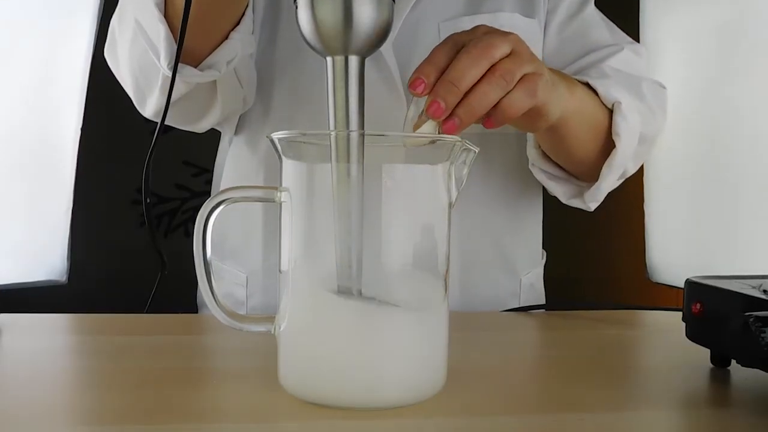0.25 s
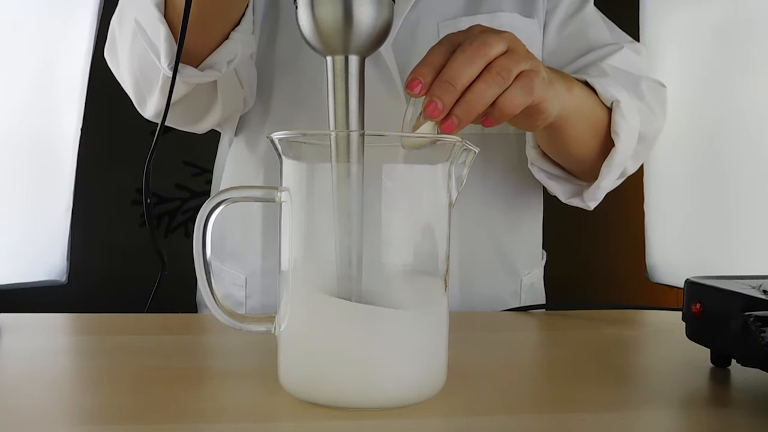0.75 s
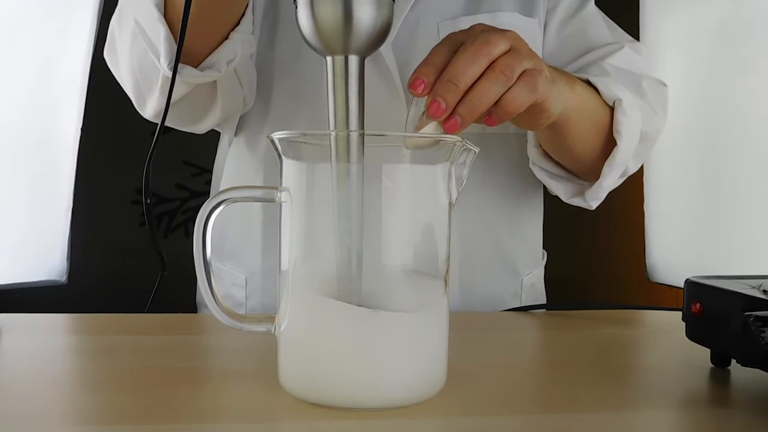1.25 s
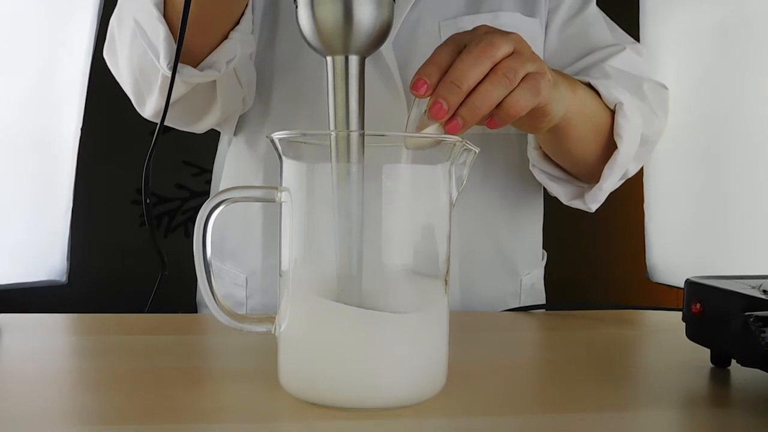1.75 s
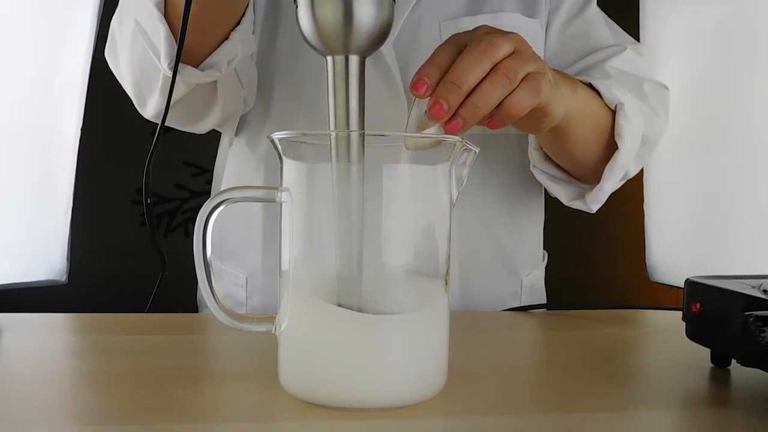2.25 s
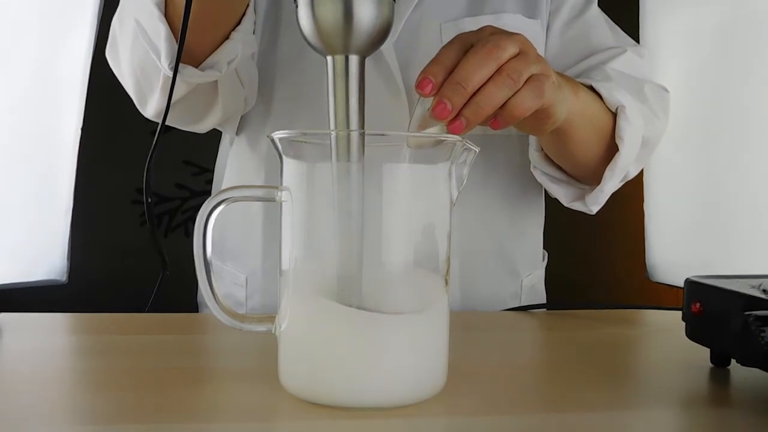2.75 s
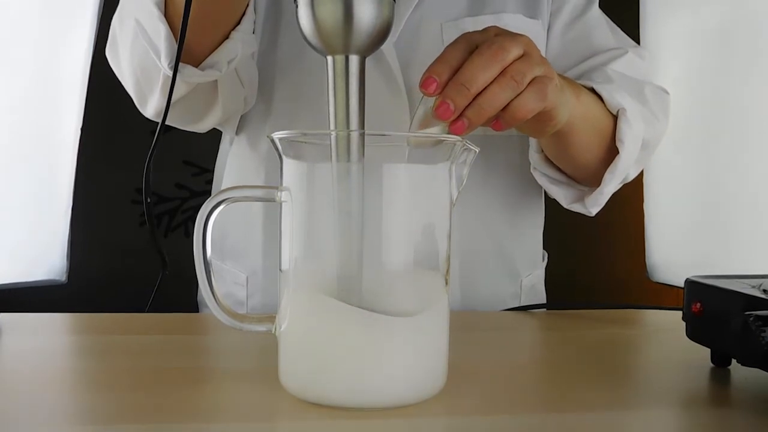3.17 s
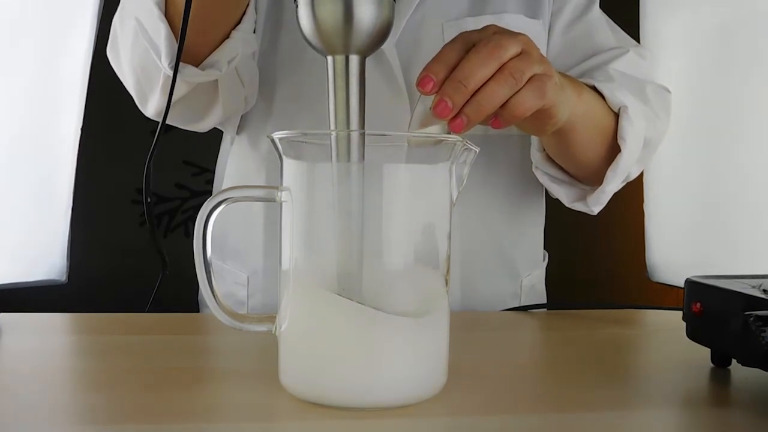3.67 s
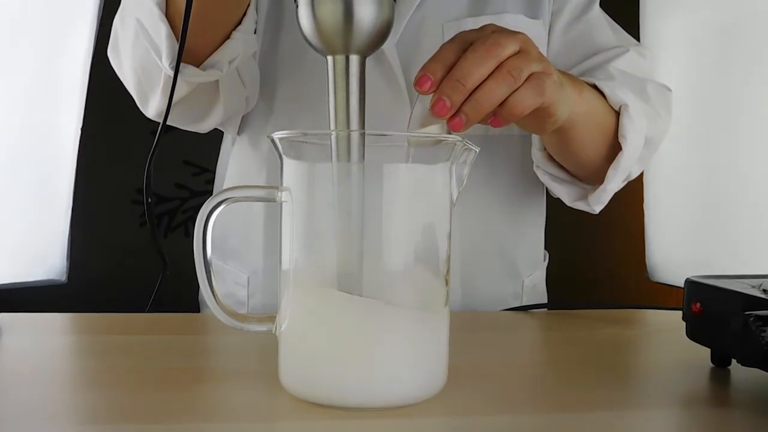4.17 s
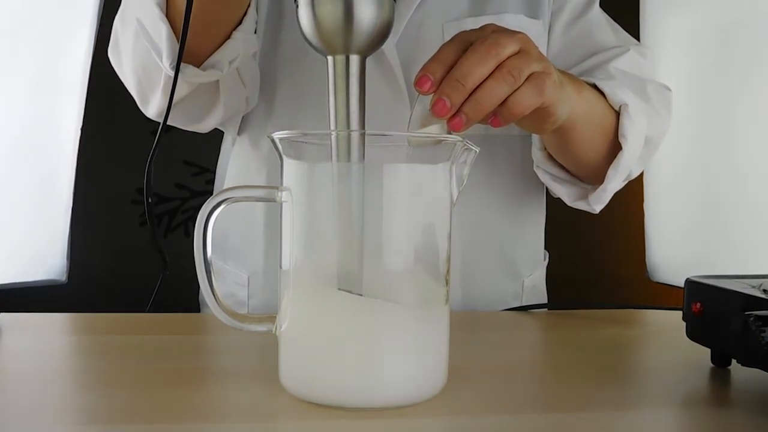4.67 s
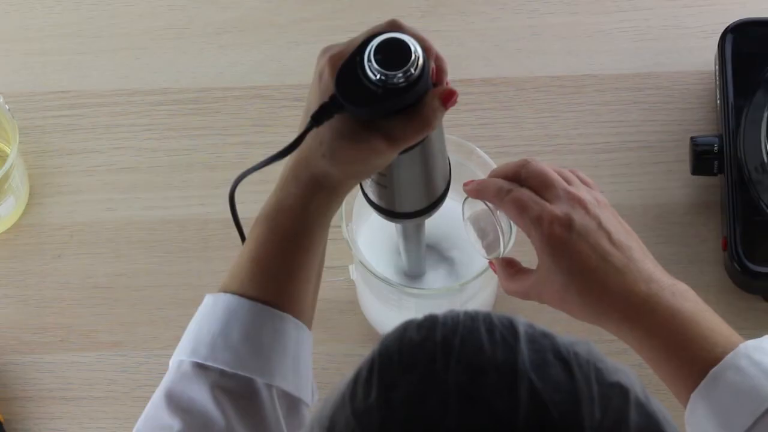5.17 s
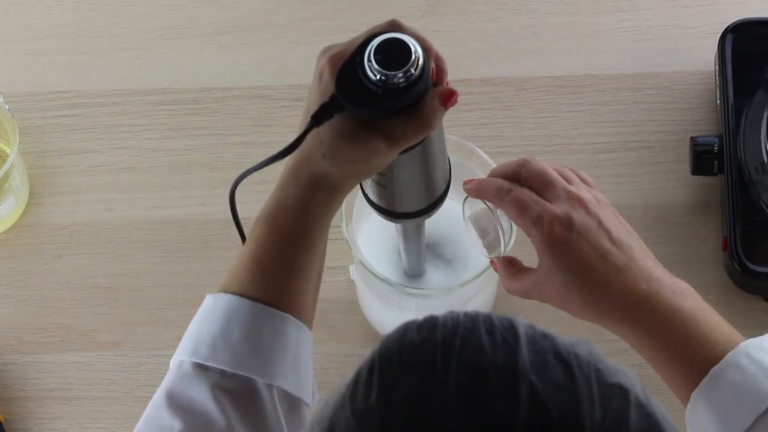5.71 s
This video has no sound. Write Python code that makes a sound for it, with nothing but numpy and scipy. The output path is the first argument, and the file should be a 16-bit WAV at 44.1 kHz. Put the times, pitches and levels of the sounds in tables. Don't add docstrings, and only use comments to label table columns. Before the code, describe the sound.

Close, nearly centred hand blender already running in a glass jug on a wooden table. Steady motor drone, airy hiss and frothy liquid turbulence; harsh steel chatter stutters, grows denser, then ends around three seconds. A cleaner whine and softer churn continue, with one tiny tick near 4.7 seconds. Short room echo, treble slightly wide.

```python
import sys
import numpy as np
from scipy import signal
from scipy.fft import rfft, irfft
from scipy.io import wavfile

SR = 44100
rng = np.random.default_rng(int(sys.argv[2]) if len(sys.argv) > 2 else 0)


def unload_wav(signal):
    wavfile.write(
        sys.argv[1],
        SR,
        np.round(np.clip(np.atleast_2d(signal).T, -1, 1) * 32767).astype(np.int16),
    )


def how_loud(loudness_db):
    steps = np.asarray(loudness_db, float) / 20
    return 10 ** steps


N = 261954
TIME_S = np.arange(N) / SR


def in_time(rows):
    s, value = np.transpose(rows)
    return np.interp(TIME_S, s, value)


def noise():
    return rng.standard_normal(N)


def shape(x, points):
    hz, db = np.transpose(points)
    bins = np.maximum(np.arange(N // 2 + 1) * SR / N, 1)
    gain_db = np.interp(np.log(bins), np.log(hz), db)
    return irfft(rfft(x) * how_loud(gain_db), N)


def pass_band(x, order, edge_hz, kind):
    return signal.sosfilt(signal.butter(order, edge_hz, kind, fs=SR, output="sos"), x)


def band_one(x, low_hz, high_hz):
    band = pass_band(x, 4, [low_hz, high_hz], "band")
    return x / np.sqrt(np.mean(band ** 2) + 1e-20)


def drift(rate_hz):
    r = np.exp(-40 * np.pi * rate_hz / SR)
    slow = signal.lfilter([1], [1, -2 * r, r * r], rng.standard_normal(N // 20 + 2002))[2000:]
    return np.interp(np.arange(N) / 20, np.arange(len(slow)), slow / slow.std())


def resonate(x, modes):
    out = 0
    for k, (hz, width, db) in enumerate(modes):
        r = np.exp(-np.pi * width / SR)
        zeros = [(1 - r * r) / 2, 0, (r * r - 1) / 2]
        poles = [1, -2 * r * np.cos(2 * np.pi * hz / SR), r * r]
        out = out + (-1) ** k * how_loud(db) * signal.lfilter(zeros, poles, x + 1e-18)
    return out


def tone(turns, db, flutter_db):
    start = rng.random()
    level = how_loud(db + flutter_db * drift(7.2))
    return np.sqrt(2) * level * np.sin(2 * np.pi * (turns + start))


def multiple_db(law, free, lean, thick):
    # (shaft multiple, time [s], half width [s], level [dB])
    swells = [(6, 0.23, 0.43, 5.5), (6, 1.24, .3, -18), (6, 2.086, 0.19, 9), (6, 2.29, 0.11, 1),
              (6, 3.02, 0.22, 9), (6, 3.47, 0.2, 3.5), (6, 4.15, 0.06, -13), (6, 4.68, .12, 5),
              (6, 5.2, 0.053, -5), (6, 5.68, .05, -6), (5, 1.02, 0.62, 13), (5, 0.748, 0.032, 8),
              (5, 1.786, 0.13, 10.5), (5, 2.58, 0.62, 15.5), (5, 3.06, 0.16, 6), (5, 4.73, .1, 14.5),
              (5, 5.8, .3, 0), (1, 0.28, 0.5, 3.5), (1, 1.37, .1, -13), (1, 1.8, .08, -10),
              (1, 2.45, 0.045, -9), (2, 0.23, .25, -2.5), (2, 1.05, 0.27, 2), (2, 2.58, .09, 6.5),
              (2, 2.26, .12, -1), (11, 1.5, .2, -8), (11, 1.997, 0.066, -13), (9, 2.11, .17, -8),
              (7, 1.37, .1, 3), (4, 3.15, 0.36, -6)]
    multiple, rest_db, free_db, lean_db, thick_db = law
    swell_db = sum(db * np.exp(-((TIME_S - s) / width) ** 4) for m, s, width, db in swells if m == multiple)
    return rest_db + free_db * free + lean_db * lean + thick_db * thick + swell_db


def motor(turns, free, lean, thick):
    # (shaft multiple, at rest [dB], gain running free [dB], gain leaning [dB], gain once thick [dB])
    hum_law = [(1, -47.5, 11, 0.1, -0.3), (2, -26.5, -1.9, 1.1, -12), (5, -37.5, -0.7, 0.3, 0.8),
               (6, -25.0, -0.7, 1.55, -0.17)]
    # (shaft multiple, at rest [dB], gains free, leaning, once thick [dB])
    glass_law = [(4, -36.0, 0.11, 4.3, 0.1), (7, -41, 0.1, 12, 0.1), (9, -54, 0.1, 23, 0.1),
                 (11, -51, 0.1, 20, 3.4), (10, -71, 0.1, 31, 10)]
    # (shaft multiple, touching [dB], running free [dB])
    whine_lines = [(3, -43, -38.5), (8, -53, -44), (23, -58, -53), (24, -61, -41), (42, -58, -65),
                   (43, -57, -53), (44, -60, -58), (45, -65, -54), (46, -64, -58), (47, -57, -49),
                   (48, -55, -56), (49, -55, -47), (50, -66, -62), (51, -58, -56), (52, -55, -60),
                   (53, -67, -65), (60, -68, -66), (62, -67, -61), (72, -62, -53), (73, -74, -64),
                   (76, -72, -69), (81, -65, -67), (83, -67, -59), (84, -71, -62), (86, -77, -65),
                   (96, -56, -58), (97, -62, -65), (117, -70, -62), (118, -64, -58), (119, -69, -59)]
    # (mains multiple, shaft multiple, running free [dB])
    mains_lines = [(4, 0, -41), (4, 1, -36), (2, 1, -46), (6, -1, -50), (-4, 6, -40), (4, 3, -47)]
    hum = sum(tone(law[0] * turns, multiple_db(law, free, lean, thick), 0.12 * law[0]) for law in hum_law)
    glass = sum(tone(law[0] * turns, multiple_db(law, free, lean, thick) - 1, 2.2) for law in glass_law)
    whine = sum(tone(k * turns, touch_db + (free_db - touch_db) * free, 1.2)
                for k, touch_db, free_db in whine_lines)
    mains = 60 * TIME_S
    pull = sum(tone(m * mains + k * turns, db, 1.0) for m, k, db in mains_lines)
    return hum + glass + how_loud(0.5) * whine + how_loud(0.2) * free * pull


def contact_db(free):
    # (start [s], length [s], level [dB])
    contacts = [(0.016, 0.02, -36.5), (0.107, 0.078, -41), (0.248, 0.065, -37), (0.378, 0.0075, -34.5),
                (0.423, 0.02, -37.5), (0.498, 0.074, -34.5), (0.625, 0.019, -39), (0.681, 0.02, -35.5),
                (0.74, 0.018, -35), (0.803, 0.043, -32.5), (0.881, 0.1, -31.5), (1.005, 0.037, -36),
                (1.08, 0.24, -33), (1.326, .2, -31.5), (1.501, 0.42, -30), (1.976, 0.072, -36),
                (2.12, 0.094, -37), (2.239, 0.14, -29.5), (2.39, .17, -31), (2.6, .11, -29.5),
                (2.743, 0.045, -29), (2.784, 0.2, -36), (3.017, 0.031, -30), (3.112, .01, -44),
                (4.665, .015, -44)]
    catch_db_per_s, slip_db_per_s = 1200, 704
    level_db = -54 - 12 * free
    for start, length, db in contacts:
        early = np.maximum(start - TIME_S, 0)
        late = np.maximum(TIME_S - start - length, 0)
        level_db = np.maximum(level_db, db - catch_db_per_s * early - slip_db_per_s * late)
    return level_db


def rattle(turns, free):
    # (time [s], peak level [dB])
    knocks = [(0.159, -14.5), (0.187, -15), (0.2448, -16.5), (0.4314, -16), (0.493, -17), (0.628, -16),
              (0.6779, -16), (0.737, -19), (0.832, -18), (0.907, -22), (1.0231, -18), (1.043, -10.5),
              (1.0848, -13), (1.109, -12), (1.1454, -16), (1.2131, -11), (1.4257, -18), (1.485, -14),
              (1.5856, -18), (1.6886, -31), (1.7828, -16), (1.9775, -15), (2.2295, -16), (2.3072, -29),
              (2.7471, -24), (2.804, -18), (2.839, -13), (2.888, -11), (2.9416, -13.5), (2.968, -12)]
    # (frequency [Hz], width [Hz], level [dB])
    guard_modes = [(1550, 87, 3.5), (2162, 110, 0), (2663, 9.4, -10), (6880, 180, -5.5),
                   (3320, 200, -6), (4210, 81, 0), (5010, 230, -6), (5980, 110, -6), (6330, 110, -6),
             (7290, 260, -8), (7640, 39, -14), (8350, 170, -2), (8930, 51, -14), (9420, 85, -8),
             (9890, 87, -9), (11000, 120, -7), (11700, 130, -15), (12200, 72, -16), (12700, 110, -15),
             (13000, 110, -12), (13400, 94, -13), (14000, 160, -12), (14600, 57, -18), (15400, 300, -19)]
    # (frequency [Hz], width [Hz], level [dB])
    bell = [(4215, 80, 0)]
    level = how_loud(contact_db(free))
    strike = np.diff(np.floor(turns), prepend=0)
    uneven_db = 2.8 * np.clip(noise(), -2.5, 1.2) + 1.5 * np.clip(drift(30), -2, 1.2)
    blows = strike * level * how_loud(uneven_db) * np.sqrt(SR / 117)
    for s, db in knocks:
        blows[round(s * SR)] += how_loud(db + 10)

    fade, rise = how_loud(-60 / (0.016 * SR)), np.exp(-1 / (0.0012 * SR))
    decay = np.convolve([1, -fade], [1, -rise])
    burst = signal.lfilter([1 - rise], decay, blows + 1e-18) * np.sqrt(1 - fade ** 2)
    bounce = 1 + 0.35 * np.cos(8 * np.pi * turns) + 0.4 * np.cos(10 * np.pi * turns)
    slips = how_loud(1.6 * np.clip(drift(10), -2.5, 1))
    chatter = (burst + 0.4 * level) * bounce * slips * noise()

    bright = pass_band(chatter, 2, [5500, 15800], "band")
    steel = resonate(chatter, guard_modes) + how_loud(-22) * bright
    eased = level ** 0.7 * level.max() ** 0.3
    steel += resonate(burst * noise() + eased * noise(), bell)
    steel = pass_band(steel, 2, 700, "high")
    steel *= np.sqrt(np.mean(level ** 2) / np.mean(steel ** 2))
    return how_loud(4.5) * steel


def liquid(turns, lean, thick):
    # (time [s], level [dB])
    churn = [(0, -20), (0.3, -20.5), (0.75, -21.5), (1.0, -19.5), (1.46, -20), (1.6, -25), (1.72, -24),
             (3.11, -24), (3.19, -30.5), (3.95, -27.5), (4.05, -27.5), (4.12, -29.5), (4.66, -23),
             (4.9, -27), (5.01, -24), (5.1, -28), (5.38, -24), (5.94, -29)]
    # (frequency [Hz], level [dB per Hz])
    slosh_spectrum = [(76, -45), (130, -15.5), (146, -24), (199, -15.5), (215, -16), (231, -10),
                      (264, -11.5), (560, 0), (730, -21), (1230, -120)]
    # (frequency [Hz], level [dB per Hz])
    froth_spectrum = [(520, -28.5), (880, -1), (995, -3.5), (1100, -1), (1350, -5), (2240, -7), (2520, -8),
                      (2700, -8.5), (3050, -15.5), (4500, -20), (5850, -82), (9900, -120)]
    # (frequency [Hz], width [Hz], level [dB])
    air_column = [(567.5, 75, -7), (680, 48, 0), (817.3, 35, -5.5), (904, 104, -15), (1257, 29.5, -7),
                  (1460, 45, -8.5)]
    # (frequency [Hz],
    # width [Hz], level [dB])
    narrow_peaks = [(1425, 25, 3), (2020, 30, 4), (2175, 25, 2), (2632, 20, 8), (2860, 20, 4), (3250, 40, 4),
                    (3545, 20, 9), (3775, 20, 8)]
    # (frequency [Hz], level [dB])
    rim_dip = [(845, 0), (885, -10), (915, 0)]
    column_db = in_time(churn)
    swing_db = column_db + 25
    slosh_db = -35 + 0.42 * swing_db - 9.5 * thick
    froth_db = -32.5 + 0.23 * swing_db + 2.5 * lean
    sweep = 1 + 0.11 * np.cos(2 * np.pi * turns)

    slosh = band_one(shape(noise(), slosh_spectrum), 247, 358.3) * how_loud(slosh_db + 1.5 * drift(25))

    column = resonate(resonate(noise() * sweep, air_column), [(700, 780, 0)])
    column = pass_band(band_one(column, 608, 688.3), 2, 250, "high")
    column = column * how_loud(column_db - 2.12 + 0.74 * drift(17))

    froth = shape(noise() * sweep, froth_spectrum)
    froth += resonate(shape(noise(), froth_spectrum), narrow_peaks)
    froth = band_one(froth, 1305, 2840) * how_loud(froth_db + 0.73 + 1.07 * drift(7.6))
    return slosh + shape(column + froth, rim_dip)


def fan(turns):
    # (frequency [Hz], level [dB per Hz])
    air_spectrum = [(2650, -28), (4500, -9.5), (5630, -4.5), (6440, -10.5), (7380, -10.5), (7970, -12),
                    (8400, -13.5), (8850, -13.5), (11200, -4), (11500, -13.5), (12100, -23), (13300, -11.5),
                    (14200, -10), (15200, -10.5), (15500, -24)]
    # (frequency [Hz], level [dB])
    air_dip = [(11400, -2.5), (11750, -6), (12250, -10), (12400, -1)]
    pulse = 1 + 0.3 * np.cos(4 * np.pi * turns) + 0.2 * np.cos(12 * np.pi * turns)
    one_turn = rng.standard_normal(380)
    repeating = np.interp(turns % 1, np.linspace(0, 1, len(one_turn)), one_turn)
    air = shape(noise() * pulse + 0.7 * repeating, air_dip)
    air = shape(air, air_spectrum) * how_loud(0.5 * drift(4.2))
    return how_loud(-46) * band_one(air, 6780, 10500)


def reflections(x):
    t60_s = 0.11
    t = np.arange(int(0.2 * SR)) / SR
    echo = rng.standard_normal(len(t)) * how_loud(-60 * t / t60_s)
    return signal.fftconvolve(x, echo / np.linalg.norm(echo))[:N]


def room_rumble():
    # (frequency [Hz], level [dB per Hz])
    rumble_spectrum = [(13, -66), (22, -36), (59, -23), (81, -26), (89, -12), (100, -20), (130, -27),
                       (220, -120)]
    return band_one(shape(noise(), rumble_spectrum), 30, 100)


def scene():
    # (time [s], speed [turns per s])
    speed = [(0, 118.42), (0.3, 118.25), (0.48, 118.38), (0.7, 118.1), (0.86, 117.57), (1.08, 117.88),
             (1.45, 117.87), (1.68, 117.52), (1.9, 117.42), (2.08, 117.15), (2.26, 117.42), (2.48, 116.65),
             (3.08, 116.68), (3.33, 115.55), (3.48, 115.78), (4.52, 115.97), (4.68, 116.62), (4.95, 115.92)]
    # (time [s], share of running free [0-1])
    grip = [(0, 0.52), (1.8, 0.12), (2.5, 0.7), (3.0, 0.8), (3.2, 1), (5.94, 0.99)]
    # (time [s], share [0-1])
    leaning = [(0, 0), (0.55, 0.1), (0.8, 0.84), (1.8, 0.97), (2.75, 0.94), (3.1, 0.35), (3.3, 0.01),
               (4.35, 0.34), (4.68, 0.42), (4.95, 0.26), (5.94, 0.02)]
    # (frequency [Hz], level [dB])
    side_level = [(60, -10), (130, -12), (290, -15), (640, -19), (1410, -13), (3100, -6), (6820, -3),
                  (15000, -1)]
    turns = np.cumsum(in_time(speed) + 0.03 * drift(6)) / SR
    free = np.clip(in_time(grip), 0, 1)
    lean = in_time(leaning)
    thick = np.minimum(TIME_S / 2.76, 1)

    treble = fan(turns) + rattle(turns, free)
    sources = [motor(turns, free, lean, thick), treble, liquid(turns, lean, thick)]
    side = shape(sum(map(reflections, sources)), side_level)
    mid = sum(sources) + how_loud(-15) * reflections(treble)
    mid = mid + how_loud(-68) * room_rumble()
    side = side + how_loud(-65) * room_rumble()
    left_db = 0.5
    return np.array([mid + side, mid - side]) * how_loud([[left_db / 2], [-left_db / 2]])


def roll_off(x):
    return signal.sosfilt(signal.butter(12, 15750, fs=SR, output="sos"), x)


def record(dry):
    over = np.maximum(np.abs(dry) - 0.4, 0)
    rounded = dry - np.sign(dry) * (over - 0.2 * np.tanh(over / 0.2))
    mix = pass_band(rounded, 6, 16200, "low")
    return roll_off(mix)


dry = scene()
out = record(dry)
unload_wav(out)
```